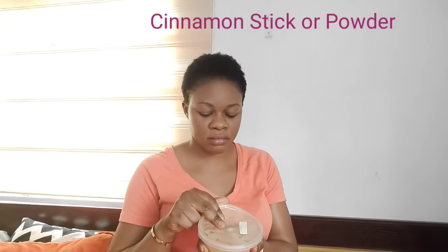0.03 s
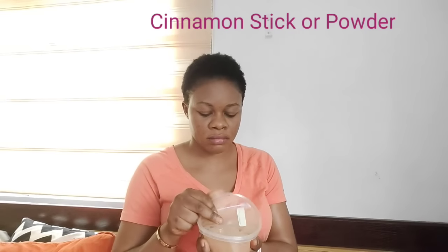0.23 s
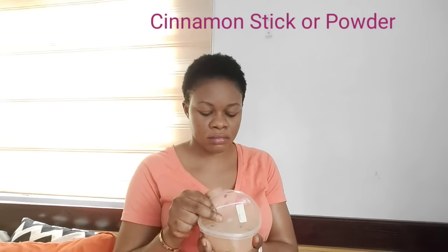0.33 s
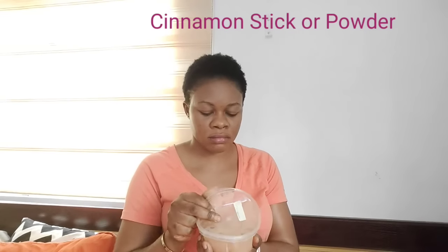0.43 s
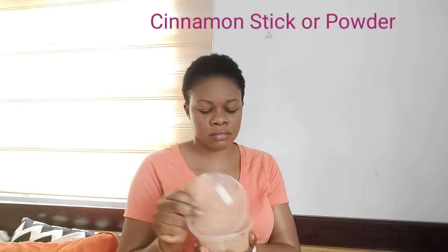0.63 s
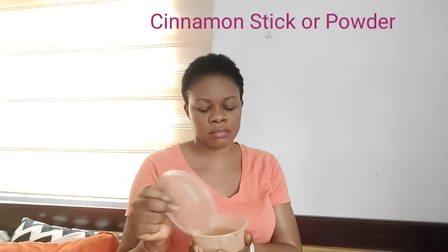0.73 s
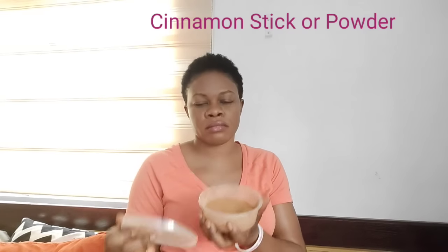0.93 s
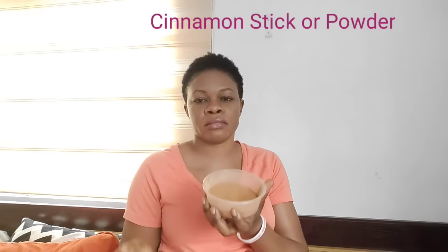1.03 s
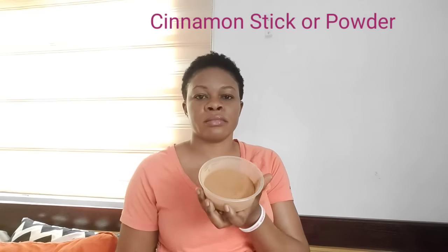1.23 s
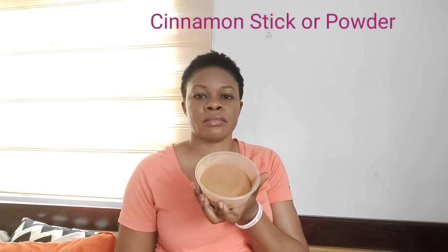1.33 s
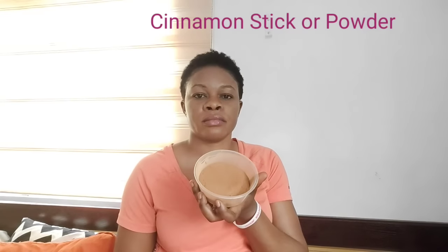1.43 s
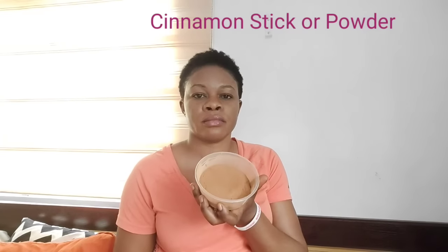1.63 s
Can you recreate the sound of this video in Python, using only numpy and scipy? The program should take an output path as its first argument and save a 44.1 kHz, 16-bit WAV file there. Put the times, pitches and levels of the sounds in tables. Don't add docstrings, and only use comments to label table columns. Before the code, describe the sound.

Thin plastic tub lid coming off, first a loud snap and puff as the seal breaks, then scraping and scattered clicks, finally a dense burst of snaps, with short bright room echo over a low quiet hum.

```python
import sys
import numpy as np
from scipy import signal
from scipy.io import wavfile
from scipy.ndimage import uniform_filter1d

SR = 44100
rng = np.random.default_rng(int(sys.argv[2]) if len(sys.argv) > 2 else 0)


def gain_from_db(level_db):
    decades = np.asarray(level_db, float) / 20
    return 10 ** decades


def pcm_store(signal):
    levels = np.round(np.clip(np.atleast_2d(signal), -1, 1) * 32767)
    wavfile.write(sys.argv[1], SR, levels.astype(np.int16).T)


N = 74970

# pitch_hz, level_db
FLOOR_COLOUR = [(35, -48), (65, -21.5), (110, -1.5), (200, -7.5), (300, -12.5), (700, -16), (3000, -28),
                (15500, -36)]
# pitch_hz, likeness_0_to_1
FLOOR_LIKENESS = [(100, .75), (200, .85), (380, .5), (700, .2), (1300, 0)]
FLOOR_DB = -56
HUM_HZ, HUM_WIDTH_HZ, HUM_DB = 218, 9, -58.5

# pitch_hz, time_to_fall_60_db_s
ROOM_T60 = [(100, 0.21), (400, 0.68), (1000, 0.47), (3000, 0.51), (6000, .46), (15000, 0.33)]
# pitch_hz, level_db
ROOM_COLOUR = [(80, -33), (250, -24), (450, -2.5), (700, 3), (1200, -4.5), (2500, 2.5), (8000, 4.5),
               (15000, 4.5)]
# pitch_hz, likeness_0_to_1
ROOM_LIKENESS = [(100, .85), (200, .9), (380, .5), (700, .05), (6000, 0)]
ROOM_DB, FIRST_WALL_S, BUILD_S = -2.5, 0.0016, 0.0022
LATE_DB, LATE_STRETCH = -21, 2.3
EARLIER_AGO_S, EARLIER_DB = 0.16, 15
EARLIER_LOW_HZ, EARLIER_TILT_HZ, EARLIER_TILT_DB = 900, 1540, -13

# pitch_hz, level_db, time_to_fall_60_db_s
TUB = [(300, -12, .02), (388, 0, .04), (452, 0, .04), (560, -6, .02), (655, -2, .025)]
# pitch_hz, level_db, time_to_fall_60_db_s
LID = [(760, -6, .015), (870, -7, .02), (1040, 0, .03), (1187, -3, .025), (1315, -7, .02), (1600, -7, .012)]
# pitch_hz, level_db, time_to_fall_60_db_s
NAIL = [(1990, 1, 0.01), (2315, 7.5, 0.0044), (2917, -2.5, 0.0017), (3620, -4.5, 0.002)]
RADIATES_FROM = 0.8
CONTACT_HZ = 4100
MODE_SPREAD_DB = 2.5
BODY_LAG_S = 0.00005

# start_s, level_db
TOUCH = [
    (.06, -78),
    (.075, -59.5),
    (.105, -60),
    (0.119, -80.5),
]
# start_s, level_db
DRAG = [
    (0.254, -80.5),
    (0.268, -24),
    (0.28, -43.5),
    (0.296, -40),
    (.312, -25),
    (0.333, -29.5),
    (.36, -33),
    (.40, -38.5),
    (0.461, -58),
]
# start_s, level_db
TEAR = [
    (.634, -79.5),
    (0.64, -27),
    (0.659, -36.5),
    (.670, -22),
    (.680, -8.5),
    (0.685, -24),
    (.703, -42.5),
    (.715, -58.5),
]
DRAG_SLIPS_PER_S, SLIP_UNEVEN_DB = 1000, 1
DRAG_TUB_DB, DRAG_NAIL_DB, DRAG_HISS_DB = -5, -5, -2.5

SNAP_S = [.1235, .2130, .2187, .2690, .3010, .4280, .4837, .4950, .5277, .5978, .6038, .6214, .6238, .6400,
          .6440, .6500, .6680, .6718, .6765, .6793, .6825, .6925, .6990]
# tub_boom_db, lid_ring_db, nail_tick_db, crack_db
SNAPS = [(-48, -23, -22.5, -36.5), (-12.5, -12.5, -14.5, -1.5), (-22.5, -7, -27.5, -16),
         (-20, -15, -28, -24), (-18, -23.5, -21, -19.5), (-23, -28.5, -40.5, -43.5),
         (-15.5, -32.5, -20, -23.5), (-22, -9, -40.5, -37.5), (-22, -17, -12.5, -3), (-27, -26, -32, -42),
         (-14, -14, -15, -20), (-23, -8.5, -33.5, -35.5), (-21, -41, -25, -3.5), (-25, -16.5, -25.5, -5.5),
         (-33.5, -20, -24.5, -15), (-23, -16, -22.5, -10), (-16, -26.5, -21.5, -29),
         (-22, -9.5, -15.5, -18.5), (-11.5, -13, -22.5, -18.5), (-16, -20.5, -6, -4),
         (-19.5, -12.5, -33, -11.5), (-24.5, -11, -21.5, -30), (-22, -9, -26, -29.5)]
CRACK_T60_S, CRACK_LOW_HZ, CRACK_LIKENESS = 0.004, 4050, 0.14
CHATTER_S, CHATTER_LOSS_DB, CHATTER_BODY_LOSS_DB = 0.0019, 4, 7

POP_S, POP_DB, POP_HZ, POP_DAMPING, POP_RISE_HZ = 0.2131, -9, 106, 0.23, 500
POP_PAN_DB, POP_LAG_S = -3.5, 0.00007
SUCK_S, SUCK_DB = 0.0024, -7.5
JET_DB, JET_S = -4, 0.0007

# pitch_hz, width_hz, left_db, right_db
PORTS = [(5326, 1420, -11, -10.5), (8630, 1800, 3.5, 12.5), (13600, 1700, 2, -11.5), (4000, 3600, 4, 3)]
MIC_LOW_HZ, MIC_HIGH_HZ = 45, 16000


def rms_one(x):
    return x / np.sqrt(np.mean(x ** 2) + 1e-20)


def at_hz(points, hz):
    table = np.array(points)
    return np.interp(np.log(hz), np.log(table[:, 0]), table[:, 1])


def high_pass(x, order, hz):
    return signal.sosfilt(signal.butter(order, hz, "high", fs=SR, output="sos"), x)


def pair(mid, side, alike):
    alike = np.clip(alike, 0, 1)
    shared = np.sqrt((1 + alike) / 2) * mid
    opposed = np.sqrt((1 - alike) / 2) * side
    return shared + opposed * np.array([[1], [-1]])


def bands(size, likeness):
    edges = 30 * 2 ** np.arange(0, 9.6, 0.5)
    white = rng.standard_normal((2, 2, size))
    for k, (low, high) in enumerate(zip(edges, edges[1:])):
        band = signal.butter(2, [low, high], "band", fs=SR, output="sos")
        mid, side = signal.sosfilt(band, white[k % 2])
        hz = np.sqrt(low * high)
        yield hz, pair(mid, side, at_hz(likeness, hz))


def ring(clicks, hz, t60):
    r = gain_from_db(-60 / (t60 * SR))
    w = 2 * np.pi * hz / SR
    return signal.lfilter([0, np.sin(w)], [1, -2 * r * np.cos(w), r * r], clicks + 1e-18)


def radiate(x, modes):
    edges = [RADIATES_FROM * modes[0][0], CONTACT_HZ]
    return signal.sosfilt(signal.butter(3, edges, "band", fs=SR, output="sos"), x)


def aslant(x):
    left = np.pad(x, (int(BODY_LAG_S * SR), 0))[:N]
    return np.stack([left, x])


def bright(envelope):
    mid, side = rng.standard_normal((2, N))
    return high_pass(envelope * pair(mid, side, CRACK_LIKENESS), 2, CRACK_LOW_HZ)


def floor():
    tone = rms_one(sum(gain_from_db(at_hz(FLOOR_COLOUR, hz)) * b for hz, b in bands(N, FLOOR_LIKENESS)))
    hum_t60 = np.log(1000) / np.pi / HUM_WIDTH_HZ
    hum = rms_one(ring(rng.standard_normal(N), HUM_HZ, hum_t60))
    return gain_from_db(FLOOR_DB) * tone + gain_from_db(HUM_DB) * hum


def fade(t60s):
    return np.hypot(gain_from_db(-60 * t60s), gain_from_db(LATE_DB - 60 * t60s / LATE_STRETCH))


def room(x):
    t = np.arange(SR) / SR
    build = 1 - np.exp(-np.maximum(t - FIRST_WALL_S, 0) / BUILD_S)
    echo = np.zeros((2, SR))
    for hz, band in bands(SR, ROOM_LIKENESS):
        echo += gain_from_db(at_hz(ROOM_COLOUR, hz)) * fade(t / at_hz(ROOM_T60, hz)) * band
    echo *= build
    echo = gain_from_db(ROOM_DB) * echo / np.sqrt(np.mean(np.sum(echo ** 2, axis=1)))
    wet = signal.fftconvolve(x[1:], echo, axes=1)[:, :N]

    late = high_pass(echo, 2, EARLIER_LOW_HZ)[:, int(EARLIER_AGO_S * SR):]
    dull = signal.sosfilt(signal.butter(2, EARLIER_TILT_HZ, fs=SR, output="sos"), late)
    late = dull + gain_from_db(EARLIER_TILT_DB) * late
    return wet + gain_from_db(EARLIER_DB) * np.pad(late, ((0, 0), (0, N - late.shape[1])))


def rub(slips, modes):
    tones = sum(ring(slips * gain_from_db(db) * rng.random(N), hz, t60) for hz, db, t60 in modes)
    return rms_one(radiate(tones, modes))


def drag():
    s, db = np.transpose(TOUCH + DRAG + TEAR)
    gain = gain_from_db(np.interp(np.arange(N) / SR, s, db, left=-120, right=-120))
    sizes = gain_from_db(SLIP_UNEVEN_DB * np.minimum(rng.exponential(1, N), 4)) * rng.choice([-1, 1], N)
    slips = sizes * (rng.random(N) < DRAG_SLIPS_PER_S / SR)
    tub, lid, nail = rub(slips, TUB), rub(slips, LID), rub(slips, NAIL)
    body = gain * (gain_from_db(DRAG_TUB_DB) * tub + lid + gain_from_db(DRAG_NAIL_DB) * nail)
    grit = rms_one(uniform_filter1d(np.abs(slips), size=40) + 0.05)
    return aslant(body) + bright(gain_from_db(DRAG_HISS_DB) * grit * gain)


def clicks_at(s, height):
    clicks = np.zeros(N)
    clicks[(s * SR).astype(int)] = height
    return clicks


def strike(modes, s, db):
    out = np.zeros(N)
    spread = rng.standard_normal((len(s), len(modes)))
    for k, (hz, mode_db, t60) in enumerate(modes):
        height = gain_from_db(db + mode_db - 10 + MODE_SPREAD_DB * spread[:, k])
        out += ring(clicks_at(s, height), hz, t60)
    return radiate(out, modes)


def chatter(x, loss_db):
    lag = int(CHATTER_S * SR)
    return sum(gain_from_db(-loss_db * k) * np.pad(x, (k * lag, 0))[:N] for k in range(4))


def snaps():
    s = np.array(SNAP_S)
    tub_db, lid_db, nail_db, crack_db = np.transpose(SNAPS)
    nail = chatter(strike(NAIL, s, nail_db), CHATTER_BODY_LOSS_DB)
    body = strike(TUB, s, tub_db) + strike(LID, s, lid_db) + nail
    cracks = chatter(clicks_at(s, gain_from_db(crack_db - 3.5)), CHATTER_LOSS_DB)
    spit = signal.lfilter([1], [1, -gain_from_db(-60 / (CRACK_T60_S * SR))], cracks + 1e-18)
    return aslant(body) + bright(spit)


def pop():
    t = np.arange(N) / SR - POP_S - np.array([[POP_LAG_S], [0]])
    after = np.maximum(t, 0)
    w = 2 * np.pi * POP_HZ
    rise = 1 - np.exp(-2 * np.pi * POP_RISE_HZ * after)
    push = np.exp(-POP_DAMPING * w * after) * np.cos(w * after) * rise
    pull = gain_from_db(SUCK_DB) * np.exp(np.minimum(t, 0) / SUCK_S) * np.cos(w * t / 2) * (t < 0)
    jet = gain_from_db(JET_DB) * (after / JET_S * np.exp(1 - after / JET_S)) ** 2
    return (gain_from_db(POP_DB) * (push - pull) + jet) * gain_from_db([[POP_PAN_DB / 2], [-POP_PAN_DB / 2]])


def ports(x):
    out = x.copy()
    for hz, width_hz, *gains_db in PORTS:
        w = 2 * np.pi * hz / SR
        a = np.sin(w) * width_hz / hz / 2
        middle = -2 * np.cos(w)
        for c, db in enumerate(gains_db):
            g = gain_from_db(db / 2)
            out[c] = signal.lfilter([1 + a * g, middle, 1 - a * g], [1 + a / g, middle, 1 - a / g], out[c])
    return out


def scene():
    lid = drag() + snaps() + pop()
    return ports(lid + room(lid)) + floor()


def low_pass(x):
    return signal.sosfilt(signal.butter(12, 16370, fs=SR, output="sos"), x)


def record(dry):
    x = signal.sosfilt(signal.cheby2(16, 40, MIC_HIGH_HZ, fs=SR, output="sos"), dry)
    x = high_pass(x, 1, MIC_LOW_HZ)
    return low_pass(np.clip(x, -1, 1))


dry = scene()
out = record(dry)
pcm_store(out)
```